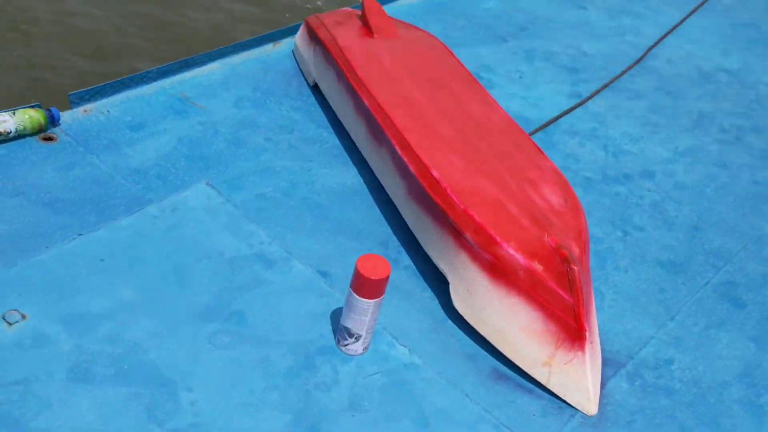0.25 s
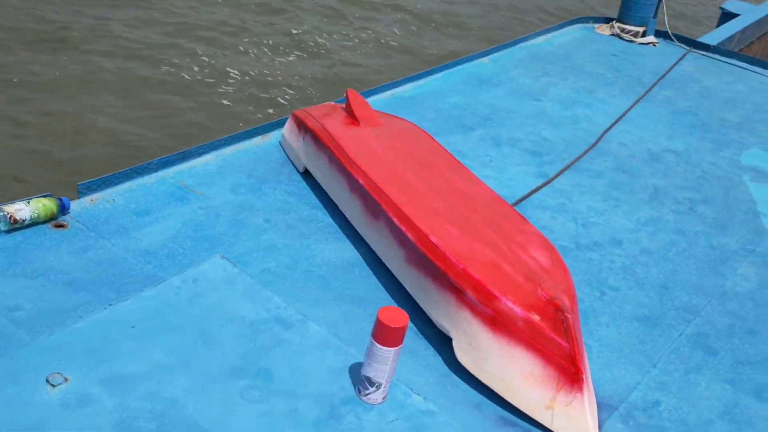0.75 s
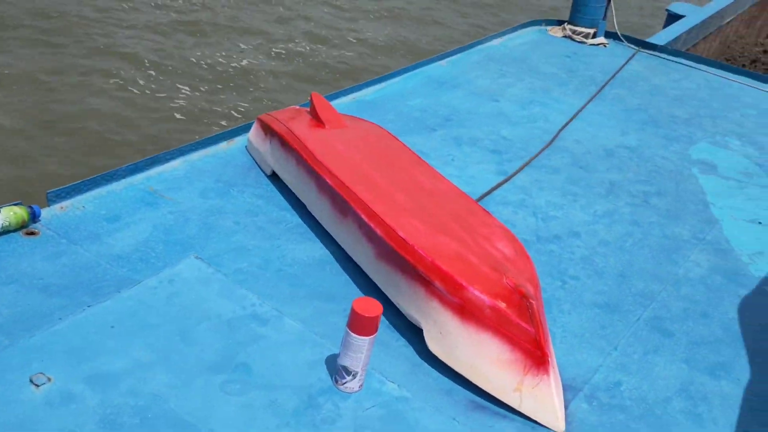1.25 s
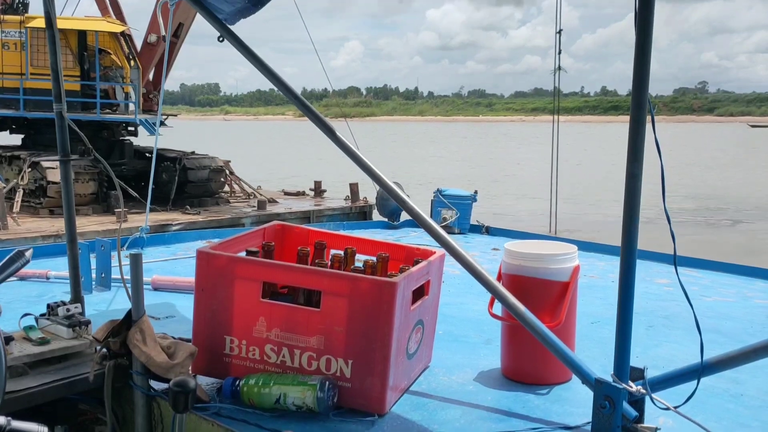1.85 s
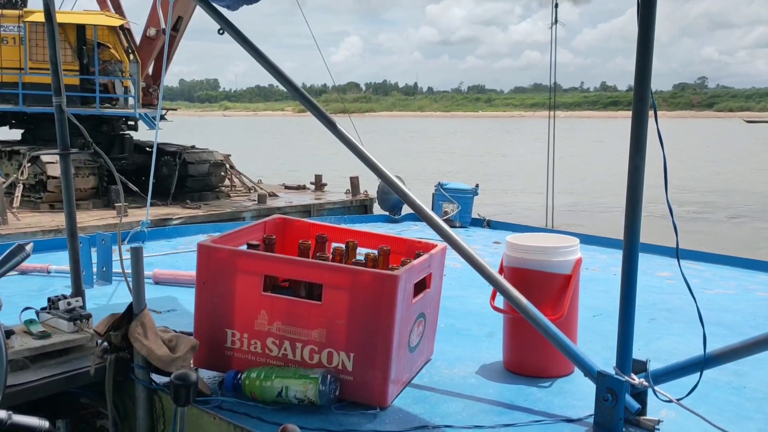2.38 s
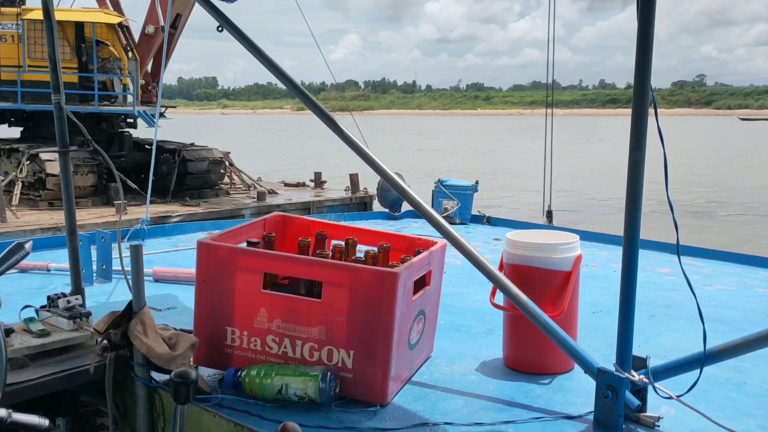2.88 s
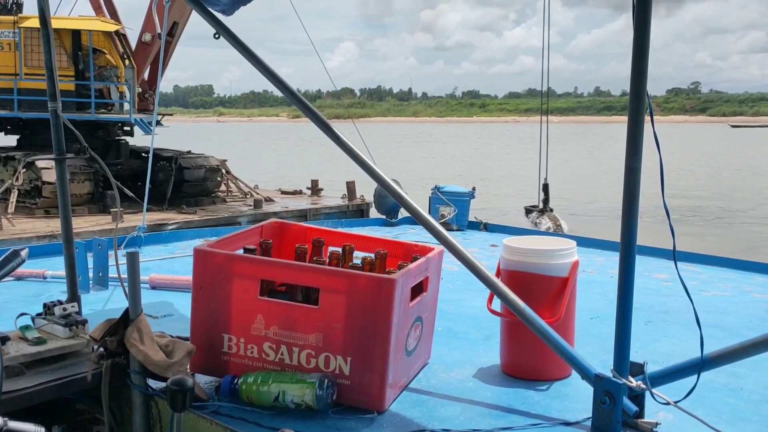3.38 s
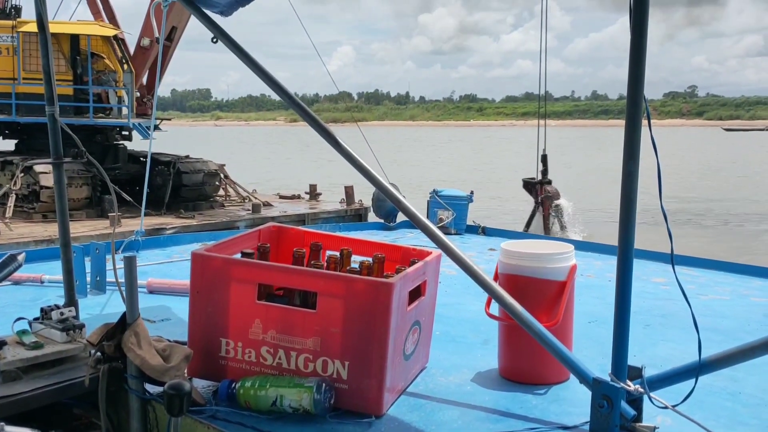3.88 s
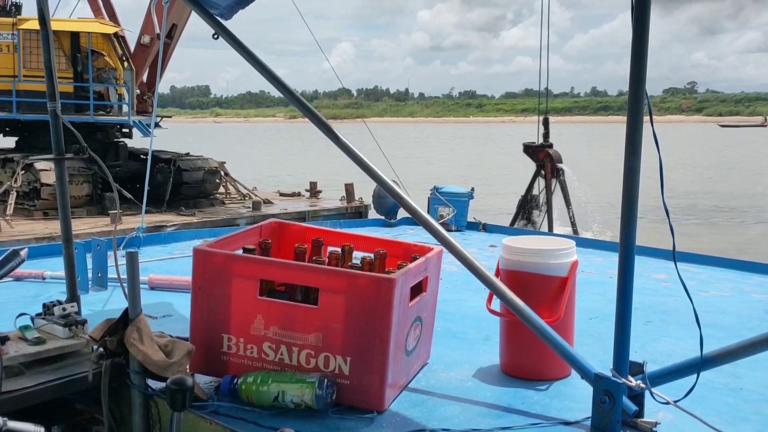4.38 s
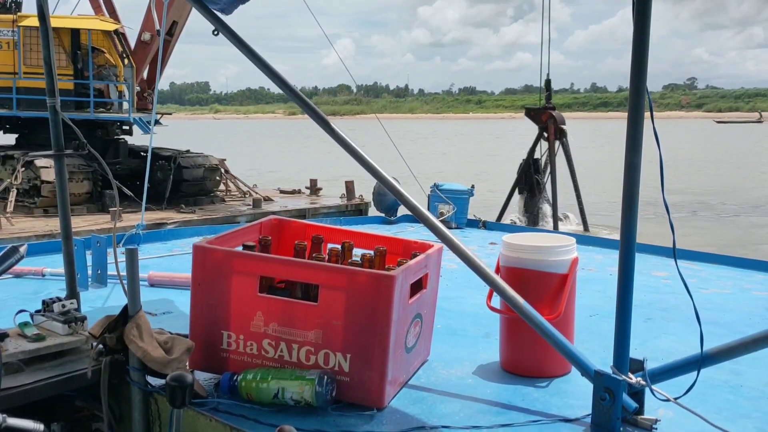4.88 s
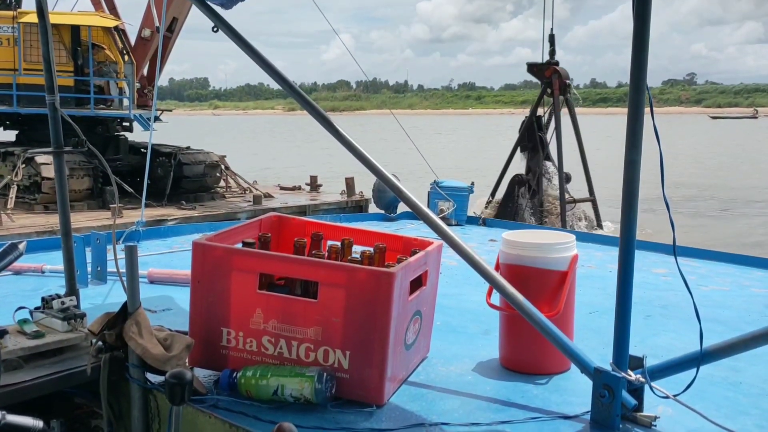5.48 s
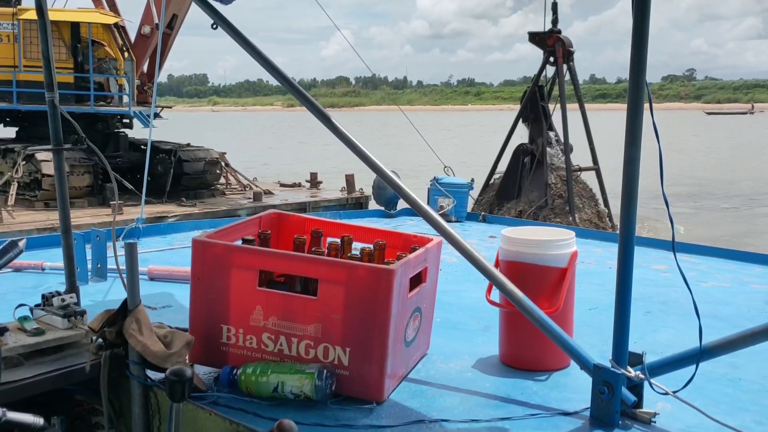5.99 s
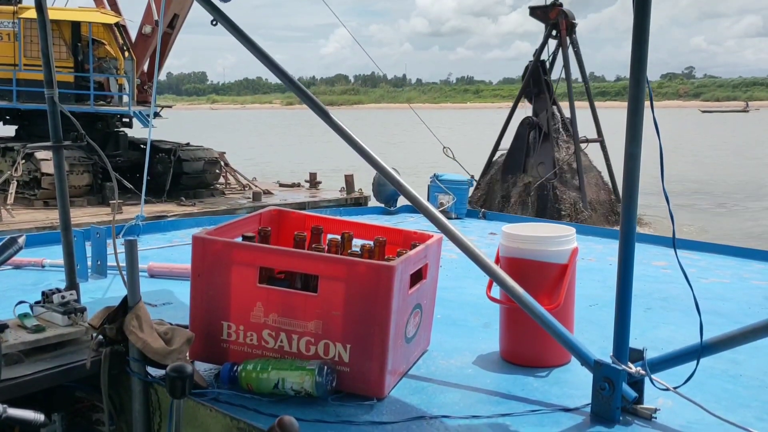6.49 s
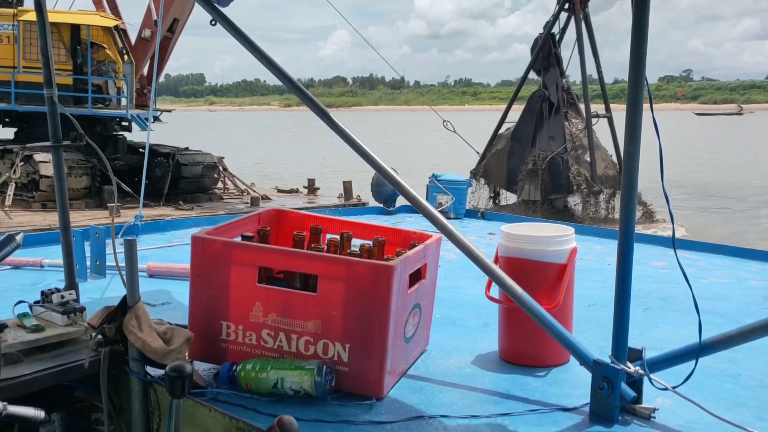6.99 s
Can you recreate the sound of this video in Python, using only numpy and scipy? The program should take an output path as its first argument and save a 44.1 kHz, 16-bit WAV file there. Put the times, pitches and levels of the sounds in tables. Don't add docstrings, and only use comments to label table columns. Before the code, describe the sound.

A calm, gusty barge deck cuts off abruptly; after a short silence, hoisting machinery drones with a piercing turbo whine, pump tone and brief metallic squeaks.

```python
import sys
import numpy as np
from scipy import signal
from scipy.fft import rfft, irfft, next_fast_len
from scipy.io import wavfile
from scipy.ndimage import uniform_filter1d

SR = 44100
rng = np.random.default_rng(int(sys.argv[2]) if len(sys.argv) > 2 else 0)


def how_loud(loudness_db):
    steps = np.asarray(loudness_db, float) / 20
    return 10 ** steps


def to_wav(sig):
    pcm = np.clip(np.atleast_2d(sig), -1, 1) * 32767
    pcm = np.round(pcm).astype(np.int16)
    wavfile.write(sys.argv[1], SR, pcm.T)


N = 319725
TIME = np.arange(N) / SR

# pitch in Hz, level in dB per Hz.
WIND_COLOUR = [(13, -39), (22, -15), (49, 2.5), (71, -4), (100, -4.5), (134, -4.5), (198, -8.5),
               (268, -15.5), (400, -15.5), (520, -32.5), (880, -120)]
THUMP_COLOUR = [(90, -20), (170, -1.5), (330, -2.5), (520, -9), (700, -12.5), (900, -18), (1400, -40)]
DISTANT_COLOUR = [(150, -46), (250, -5.5), (331, -6), (387, -22.5), (452, -1), (497, -9.5), (737, -4.5),
                  (889, -7.5), (976, -7.5), (3000, -22.5), (3900, -47), (6600, -120)]
AIR_COLOUR = [(1500, -35), (2200, -13), (3500, -0.5), (5240, -4.5), (8000, -9), (10500, -12.5),
              (13000, -15.5), (15600, -15)]
VALVE_COLOUR = [(1290, -46), (2200, -20), (2790, -11), (3570, -8), (4070, -5), (5830, -9), (6440, -9),
                (12200, -17.5), (14900, -14), (15600, -17)]
GUST_COLOUR = [(12, -42), (20, -11), (40, -1.5), (70, 7.5), (112, -6.5), (135, 0.5), (180, -9), (300, -120)]
ROAR_COLOUR = [(90, -11), (160, -7), (350, -0.5), (500, -4), (600, -8.5), (700, -18.5), (850, -7),
               (1100, 1), (1500, -14), (1700, -8.5), (2400, -6), (2650, -4), (3700, -0.5), (3950, -11)]
HISS_COLOUR = [(3750, -26), (3900, 0.5), (4200, -4.5), (4900, 4.5), (5500, -2.5), (6000, -1.5), (6500, -1),
               (7000, 3.5), (7300, -1.5), (7600, -7.5), (8300, -15.5), (8600, -40)]
TOP_COLOUR = [(7900, -3.5), (8600, 8), (9400, -3), (10000, -1), (11000, -0.5), (11700, -3.5), (12500, -4),
              (13200, 0), (14500, 7), (15200, -4), (15600, -3)]

# pitch in Hz, likeness from 0 to 1, lead of the right port in radians, left over right in dB.
WIND_PORTS = [(40, .9995, 0, 0), (70, .99, 0, 0), (130, .87, 0, 0), (300, .75, 0, 0)]
QUIET_PORTS = [(60, .998, 0, -1), (130, 1, 0.12, -3), (290, 0.73, 0.076, -0.5), (700, 0.4, 1.6, -4.5),
               (1400, 0.24, 1.6, -4), (3000, 0.18, 0.6, -1.5), (7950, 0.22, 0.45, -2),
               (15000, 0.97, 0.19, 1)]
CRANE_PORTS = [(55, 0.95, 3, 0), (150, 0.93, -0.97, 1.5), (515, 1, 0.57, 2.5), (655, 0.17, -1, -2),
               (1040, 1, -1.5, 6.5), (1520, 0.78, -2, -0.5), (2440, 0.73, 0, 4), (4100, 0.66, 0, 4),
               (4430, 0.87, 0, 8.5), (7900, 1, 0, 4.5), (8700, .3, 2.4, .5), (10500, .6, .3, 1.5),
               (12500, .35, -2.5, 0), (14200, 0.72, 1, -2.5)]

# time in seconds, level in dB.
CALM = [(0, 1), (.3, 0), (.4, 0.5), (.65, -2), (.97, -7.5), (1.31, -6.5)]
# centre in seconds, length in seconds, level in dB.
PUFFS = [
    (.12, 0.28, -55),
    (.4, 0.21, -36),
    (.58, 0.29, -44),
    (.93, 0.095, -42),
    (1.26, 0.06, -36),
]
# centre in seconds, length in seconds, level in dB.
THUMPS = [(.07, 0.043, -40), (.175, 0.056, -37), (.245, 0.027, -33), (.365, .05, -40), (.44, 0.045, -31),
          (.495, .04, -33), (.57, .05, -43), (.72, 0.07, -37), (.81, .03, -48), (.93, .06, -50),
          (1.04, 0.021, -36), (1.25, 0.043, -40)]
# pitch in Hz, level in dB over the wind.
IDLE_TONES = [(26, -38), (52, -4), (79, -5), (104, -15), (207, -20)]
# pitch in Hz, level in dB over the distant machinery.
IDLE_PUMP = [(999, -11.5), (1303, -24)]
# centre in seconds, length in seconds, level in dB.
VALVE_SPIT = [(.94, .09, -56)]

# time in seconds, level in dB.
CRANE_LOUDNESS = [(1.62, -22), (1.8, -20), (2.6, -21), (2.85, -23), (3.35, -25), (3.75, -24.5),
                  (4.5, -26.5), (5.3, -26), (6.2, -27), (6.45, -28), (7.25, -29)]
# centre in seconds, length in seconds, level in dB.
GUSTS = [(1.74, 0.065, -31), (2.0, 0.47, -37), (2.3, .12, -32), (2.5, 0.11, -27.5), (2.66, 0.26, -30),
         (2.87, .12, -38), (3.31, 0.11, -29), (3.45, .08, -34), (4.0, 0.22, -41), (5.65, .2, -55),
         (5.92, 0.2, -41), (6.36, 0.11, -30), (6.65, 0.59, -35)]
# centre in seconds, length in seconds, level in dB.
HUM_SWELLS = [(2.25, 0.86, -29), (3.0, 1.4, -37), (3.7, 1.08, -34.5), (4.3, 1.1, -47), (4.9, 1.3, -39.5),
              (5.5, 1.1, -34), (6.1, 0.89, -45.5)]
# start in seconds, length in seconds,
# first pitch in Hz, last pitch in Hz, level in dB.
SQUEAKS = [(5.68, .06, 5320, 5290, -38), (5.703, .045, 4620, 4680, -32), (5.727, .05, 5270, 5260, -30),
           (5.784, .064, 4810, 4880, -27.5), (5.915, .05, 5110, 5090, -31),
           (5.982, .055, 4620, 4600, -28.5), (5.985, .058, 5300, 5310, -33), (6.04, .064, 5300, 5330, -27),
           (6.11, .11, 5040, 5100, -37), (6.203, .056, 5200, 5230, -30), (6.255, .075, 5260, 5300, -28.5),
           (6.318, .03, 5300, 5480, -37),
           (5.66, .2, 5320, 5260, -40), (5.75, .1, 4700, 4900, -41), (5.95, .1, 5050, 4950, -38),
                 (6.1, .05, 5330, 5330, -38), (6.17, .07, 5070, 5110, -36), (6.24, .04, 5230, 5260, -37)]
# time in seconds, pitch in Hz.
TURBO_HZ = [(1.6, 7060), (1.95, 7369), (2.05, 7398), (2.15, 7378), (2.31, 7290), (2.48, 7142), (2.66, 7044),
            (2.84, 6986), (3.3, 6918), (3.89, 6803), (4.3, 6800), (4.8, 6908), (5.4, 6865), (5.66, 6896),
            (6.19, 7020), (6.54, 7290), (6.72, 7340), (7.25, 7439)]
# centre in seconds, length in seconds, shake in Hz.
SHAKE = [(1.95, .7, 30), (2.65, .35, 50), (3.25, .5, 40), (3.6, .3, 25), (5.05, .6, 45), (6.4, .3, 20),
         (7.05, .3, 30)]
# time in seconds, pitch in Hz.
PUMP_HZ = [
    (1.6, 263.2),
    (1.91, 272.5),
    (2.23, 279.4),
    (4.11, 279.6),
    (5.99, 278.0),
    (6.3, 271.1),
    (6.62, 263.8),
    (6.93, 258.3),
    (7.24, 260.8),
]
# overtone number, dB under the roar at that pitch, dB gained under load.
PUMP_UPPER = [(3, -10, -7), (4, -9, 1), (5, -9, -9)]
# centre in seconds, length in seconds, level in dB.
SURGE = [(1.985, 0.29, -28.5)]
# pitch in Hz, width in Hz, gain in dB.
PANELS = [(362, 15, 0), (414, 45, 2), (811, 21, -0.5), (922, 24, -1.5), (915, 11, 4.5), (1002, 39, 4),
          (1050, 18, 1.5), (1160, 13, 3.5), (1195, 18, 5), (1212, 33, -3), (1294, 14, 8.5), (1360, 33, 2),
          (1365, 28, -8.5), (1386, 30, 9), (1605, 240, 2.5), (1790, 60, 2.5), (2440, 64, 5),
          (2600, 56, 1.5), (2670, 54, -10.5), (2965, 70, 1.5), (3285, 810, -5), (3680, 150, 1),
          (4570, 82, 1.5), (5020, 120, 1.5), (5900, 62, 4), (6910, 160, 2.5), (8700, 240, -16.5),
          (10150, 280, 5.5), (10260, 150, -11)]

# pitch in Hz, dB from the usual level under which a band is muted.
MUTE_EDGE = [(7900, -5.5), (8700, -2.2), (9050, -3.8), (9500, -2.1), (10000, -4.8), (10500, -2.6),
             (11000, -3.8), (11700, -2.6), (12600, -1.2), (13100, -3.5), (13400, -30), (15150, -30),
             (15230, 2.1), (15560, 2.2), (15600, 30)]
# centre in seconds, length in seconds, treble change in dB, rise
# of the muting edge in dB.
THIN_TREBLE = [(2.52, .6, -3, 2.0), (3.55, .5, -.6, 1.1), (4.1, .5, -.6, 1.2), (4.75, .3, -.6, .8),
               (5.5, .3, -.6, .8), (6.25, .8, -1.5, 1.3)]


def evened(x):
    return x / np.sqrt(np.mean(x ** 2) + 1e-20)


def curve(rows):
    s, value = np.transpose(rows)
    return np.interp(TIME, s, value)


def over_hz(rows, hz):
    f, *values = np.transpose(rows)
    return [np.interp(np.log(hz + 1), np.log(f + 1), v) for v in values]


def wander(per_s):
    size = max(int(SR / per_s), 1)
    smooth = uniform_filter1d(rng.standard_normal(N), size)
    return evened(uniform_filter1d(smooth, size))


def hump(centre_s, length_s):
    return np.cos(np.pi * np.clip((TIME - centre_s) / length_s, -.5, .5)) ** 2


def swells(rows):
    return sum(how_loud(db) * hump(s, length) for s, length, db in rows)


def bumps(rows, column):
    return sum(row[column] * hump(row[0], row[1]) for row in rows)


def resonance(hz, centre_hz, width_hz, db):
    return db / (1 + (2 * (hz - centre_hz) / width_hz) ** 2)


def noise(shape, ports, patch_db, flicker_db, size=1024):
    frames, hz = 4 * N // size + 5, np.fft.rfftfreq(size, 1 / SR)
    a, b, c, d, patches = rng.standard_normal((frames, len(hz), 5)).T
    patches = uniform_filter1d(patches, size=10, axis=0)
    patches = evened(uniform_filter1d(patches, size=10, axis=1))
    same, lead, balance_db = (v[:, None] for v in over_hz(ports, hz))
    same = np.clip(same, 0, 1)
    left, right = how_loud(balance_db / 2), how_loud(-balance_db / 2)
    centre = np.sqrt(left ** 2 + right ** 2 + 2 * same * np.cos(lead)) / 2
    shared, private = a + 1j * b, c + 1j * d
    at_right = same * shared + np.sqrt(1 - same ** 2) * private
    z = np.array([left * shared, right * np.exp(1j * lead) * at_right])
    inside = (hz >= shape[0][0]) & (hz <= shape[-1][0])
    colour_db = over_hz(shape, hz)[0][:, None] + patch_db * patches
    z *= how_loud(colour_db) * inside[:, None] / centre
    x = signal.istft(z, nperseg=size, noverlap=size - size // 4)[1][:, :N]
    x = x * how_loud(flicker_db * wander(61))
    return x / np.std(x.mean(0))


def tone(hz, fuzz, fuzz_hz, lead, balance_db):
    turn = np.exp(2j * np.pi * (np.cumsum(hz + 0 * TIME) / SR + rng.random()))
    skirt = (wander(fuzz_hz) + 1j * wander(fuzz_hz)) * np.sqrt(.5)
    carrier = turn * (1 + fuzz * skirt) * np.sqrt(2 / (1 + fuzz ** 2))
    pair = np.array([how_loud(balance_db / 2), how_loud(-balance_db / 2) * np.exp(1j * lead)])
    return (carrier * (pair / abs(pair.mean()))[:, None]).real


def quiet_wind(blowing):
    wind = blowing * noise(WIND_COLOUR, WIND_PORTS, patch_db=1.5, flicker_db=2.5, size=4096)
    return wind + swells(THUMPS) * noise(THUMP_COLOUR, QUIET_PORTS, patch_db=2.0, flicker_db=5.0)


def idling_engine(blowing):
    idle = sum(how_loud(db) * tone(hz, fuzz=0.8, fuzz_hz=14, lead=0.02, balance_db=-.4)
               for hz, db in IDLE_TONES)
    return uniform_filter1d(blowing, size=8000) * idle


def distant_machinery():
    distant_db, pump_fade_s = -38.5 + curve(CALM), 0.83
    distant = how_loud(distant_db) * noise(DISTANT_COLOUR, QUIET_PORTS, patch_db=2.2, flicker_db=0.6)
    running = np.clip((pump_fade_s - TIME) / .15, .3, 1)
    for hz, db in IDLE_PUMP:
        pump_tone = tone(hz, fuzz=0.3, fuzz_hz=6.1, lead=1.1, balance_db=-6.0)
        distant += running * how_loud(distant_db + db) * pump_tone
    return distant


def open_air():
    level_db = -48.5 + 1.07 * curve(CALM)
    return how_loud(level_db) * noise(AIR_COLOUR, QUIET_PORTS, patch_db=0.5, flicker_db=0.3)


def air_valve():
    open_s, rise_s, shut_s = np.maximum(TIME - 0.414, 0), 0.035, 1
    top_db, bleed_db = -39, -59
    flow = np.minimum(open_s / rise_s, 1) * how_loud(top_db + bleed_db * open_s ** 2)
    flow = flow + swells(VALVE_SPIT)
    flow = flow * np.clip((shut_s + .08 - TIME) / .16, 0, 1) ** 2
    hiss = flow * noise(VALVE_COLOUR, QUIET_PORTS, patch_db=.8, flicker_db=.4)
    whistle = tone(14600, fuzz=1.5, fuzz_hz=300, lead=.2, balance_db=-1.0)
    return hiss + how_loud(-58) * hump(.43, .06) * whistle


def whirl():
    since = np.clip(TIME - 1.17, 0, .2)
    hz = 80 * 2 ** (16.5 * since)
    rough = tone(hz, fuzz=.9, fuzz_hz=170, lead=.05, balance_db=-.3)
    return rough * how_loud(-33.5) * np.minimum(since / 0.054, 1)


def quiet_deck():
    blowing = how_loud(-37.5) + swells(PUFFS)
    background = quiet_wind(blowing) + idling_engine(blowing) + distant_machinery() + open_air()
    return background + air_valve() + whirl()


def layer_db(settled_db, share, per_khz):
    louder_db = curve(CRANE_LOUDNESS) + 26
    faster_khz = (curve(TURBO_HZ) - 6900) / 1000
    return settled_db + share * louder_db + per_khz * faster_khz


def duck():
    since, hold_s, recover_s = TIME - 2.795, 0.1, 0.12
    drop = np.clip(since / 0.013, 0, 1)
    return -8.5 * drop * np.exp(-np.maximum(since - hold_s, 0) / recover_s)


def crane_wind():
    blowing = how_loud(layer_db(-41, 0.91, 0)) + swells(GUSTS)
    return blowing * noise(GUST_COLOUR, WIND_PORTS, patch_db=3.0, flicker_db=1.0, size=4096)


def deck_hum():
    plate_hz = 144.5
    hum = tone(plate_hz, fuzz=.12, fuzz_hz=8, lead=-.5, balance_db=.3)
    hum += how_loud(-12) * tone(1.49 * plate_hz, fuzz=.3, fuzz_hz=8, lead=-.4, balance_db=.5)
    return hum * swells(HUM_SWELLS)


def squeaks():
    out, shake_hz = np.zeros((2, N)), 14 * wander(250)
    sides = how_loud(np.array([[2.8], [-4.2]]))
    for s, length, from_hz, to_hz, db in SQUEAKS:
        u = np.clip((TIME - s) / length, 0, 1)
        hz = from_hz + (to_hz - from_hz) * u + shake_hz
        phase = 2 * np.pi * np.cumsum(hz) / SR
        strength = np.sin(np.pi * u) ** 0.73 * (1 + 0.2 * wander(150))
        out += how_loud(db) * np.sqrt(2) * strength * np.sin(phase) * sides
    return out


def turbo():
    hz = curve(TURBO_HZ)
    blade_db = layer_db(-30, 0.3, 3.6) + 0.22 * duck() + 1.1 * wander(27)
    blade_db = blade_db + resonance(hz, 7093, 310, 5.5)
    octave_db = layer_db(-36, 0.37, 4.4) + 0.47 * duck() + 1.8 * wander(14)
    hz = uniform_filter1d(hz, size=4000) + (10 + bumps(SHAKE, column=2)) * wander(260)
    core = how_loud(-1.0) * tone(hz, fuzz=0.7, fuzz_hz=60, lead=.02, balance_db=7.0)
    skirt = how_loud(-5.5 + .5 * duck()) * tone(hz, fuzz=4.0, fuzz_hz=440, lead=.02, balance_db=8.0)
    octave = how_loud(-3.5) * tone(2 * hz, fuzz=1.3, fuzz_hz=160, lead=.1, balance_db=.2)
    octave_skirt = how_loud(-7) * tone(2 * hz, fuzz=6.0, fuzz_hz=800, lead=.1, balance_db=4.0)
    return how_loud(blade_db) * (core + skirt) + how_loud(octave_db) * (octave + octave_skirt)


def pump():
    hz, roar_db = curve(PUMP_HZ), curve(CRANE_LOUDNESS)
    free_hz, loaded_hz = 279, 262
    load = np.clip((free_hz - hz) / (free_hz - loaded_hz), 0, 1)
    first_gain = how_loud(layer_db(-33.5, 1, 0)) + swells(SURGE)
    second_db = layer_db(-39, 1.28, 0) + resonance(2 * hz, 526, 40, 9)
    out = first_gain * tone(hz, fuzz=0.19, fuzz_hz=26, lead=-0.36, balance_db=1.0)
    octave = tone(2 * hz, fuzz=.9 - .65 * load, fuzz_hz=50, lead=-.3, balance_db=1.8)
    out += how_loud(second_db - 2.5) * octave
    for order, db, loaded_db in PUMP_UPPER:
        overtone_hz = round(order) * hz
        rough = tone(overtone_hz, fuzz=1.2 - .45 * load, fuzz_hz=60, lead=-1.4, balance_db=5.0)
        out += how_loud(roar_db + db + loaded_db * load + over_hz(ROAR_COLOUR, overtone_hz)[0]) * rough
    oil_rush = tone(4 * hz, fuzz=2.5, fuzz_hz=200, lead=-1.9, balance_db=7.5)
    return out + how_loud(roar_db - 16.5) * oil_rush


def housing(x):
    size = next_fast_len(N)
    hz = np.fft.rfftfreq(size, 1 / SR)
    colour_db = sum(resonance(hz, centre_hz, width_hz, db) for centre_hz, width_hz, db in PANELS)
    return irfft(rfft(x, size) * how_loud(colour_db), size)[:, :N]


def engine():
    roar_db = curve(CRANE_LOUDNESS)
    hiss_db = layer_db(-30.5, 0.85, 2.6) + duck() + 1.0
    top_db = layer_db(-42, 0.54, 4) + 0.71 * duck() + bumps(THIN_TREBLE, column=2) + 4.5
    roar = how_loud(roar_db) * noise(ROAR_COLOUR, CRANE_PORTS, patch_db=1.08, flicker_db=.5)
    hiss = how_loud(hiss_db) * noise(HISS_COLOUR, CRANE_PORTS, patch_db=1.0, flicker_db=.5)
    top = how_loud(top_db) * noise(TOP_COLOUR, CRANE_PORTS, patch_db=.9, flicker_db=.5)
    firing = how_loud(roar_db - 20) * tone(86.5, fuzz=0.31, fuzz_hz=6.6, lead=-.02, balance_db=.1)
    return housing(roar + hiss + top) + firing


def mute_weak_treble(x):
    middle_and_side = np.array([x[0] + x[1], x[0] - x[1]]) / 2
    hz, t, z = signal.stft(middle_and_side, SR, nperseg=1024, noverlap=512)
    bands = (abs(z[:, :512]) ** 2).reshape(2, 128, 4, -1).mean(2)
    band_hz = hz[2:512:4]
    level_db = 10 * np.log10(uniform_filter1d(bands, size=5, axis=2) + 1e-20)
    usual_db = 10 * np.log10(uniform_filter1d(bands, size=24, axis=2) + 1e-20)
    edge_rise_db = np.interp(t, TIME, bumps(THIN_TREBLE, column=3)) + .35
    edge_db = np.where(band_hz < MUTE_EDGE[0][0], -99, over_hz(MUTE_EDGE, band_hz)[0])
    heard = level_db - usual_db > edge_db[:, None] + edge_rise_db
    z[:, :512] *= np.repeat(heard, 4, axis=1)
    mid, side = signal.istft(z, SR, nperseg=1024, noverlap=512)[1][:, :N]
    return np.array([mid + side, mid - side])


def crane_fade():
    from_s, full_s, step_s = 1.471, 1.6086, 1024 / SR
    ripple = np.sin(2 * np.pi * (TIME - 1.523) / step_s)
    stepped = TIME + .95 * step_s / (2 * np.pi) * ripple
    fade = np.clip((stepped - from_s) / (full_s - from_s), 0, 1) ** 4.5
    return fade + how_loud(-70) * np.clip((TIME - 1.44) / .05, 0, 1)


def scene():
    stop = np.clip((1.3145 - TIME) / 0.00067, 0, 1)
    crane = crane_wind() + deck_hum() + squeaks() + turbo() + pump() + engine()
    return stop * quiet_deck() + crane_fade() * mute_weak_treble(crane)


def low_pass(x):
    return signal.sosfilt(signal.butter(12, 16180, fs=SR, output="sos"), x)


def record(dry):
    ceiling = 1.15
    mix = ceiling * np.tanh(dry / ceiling)
    return low_pass(mix)


dry = scene()
out = record(dry)
to_wav(out)
```